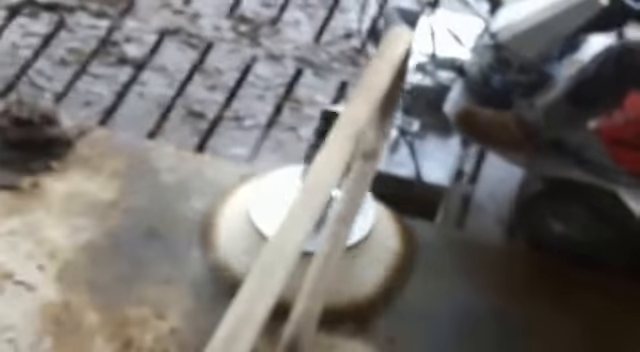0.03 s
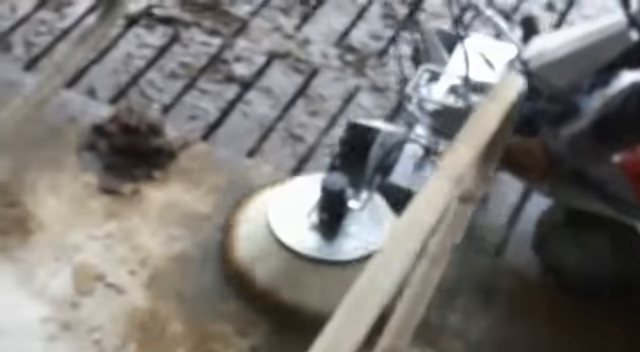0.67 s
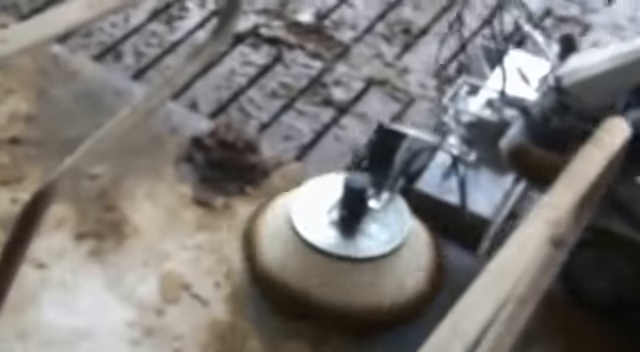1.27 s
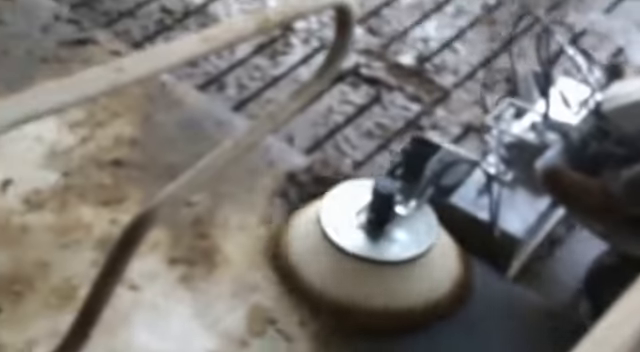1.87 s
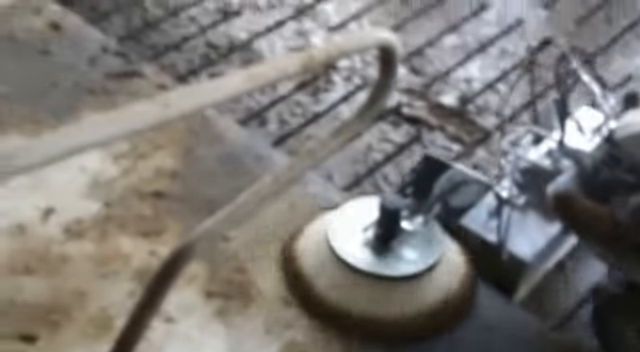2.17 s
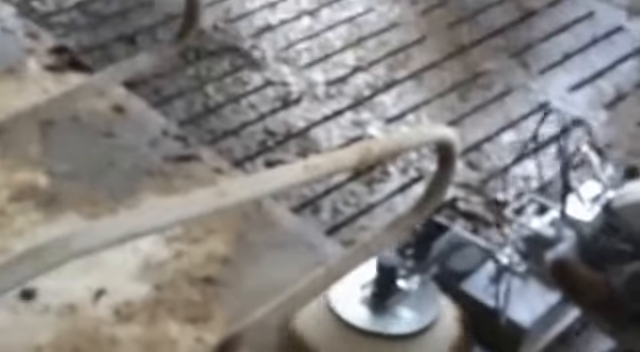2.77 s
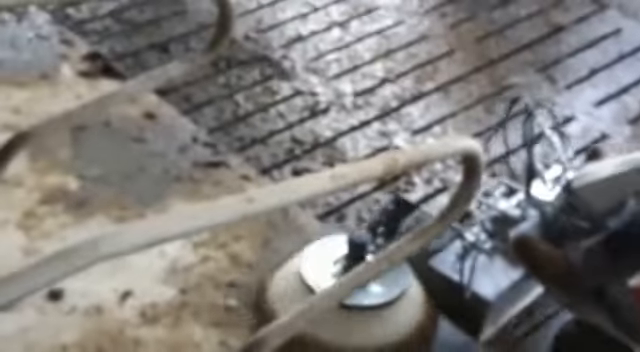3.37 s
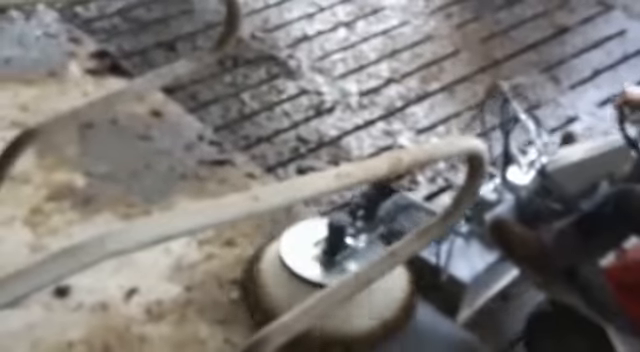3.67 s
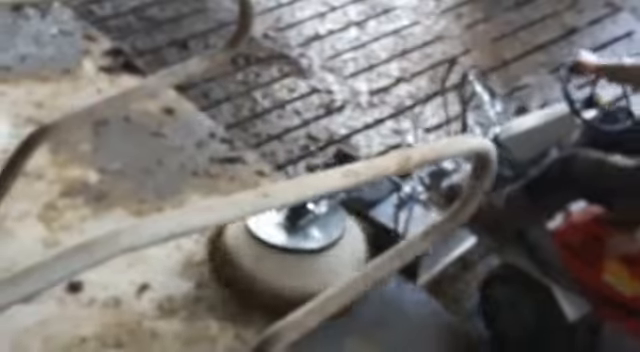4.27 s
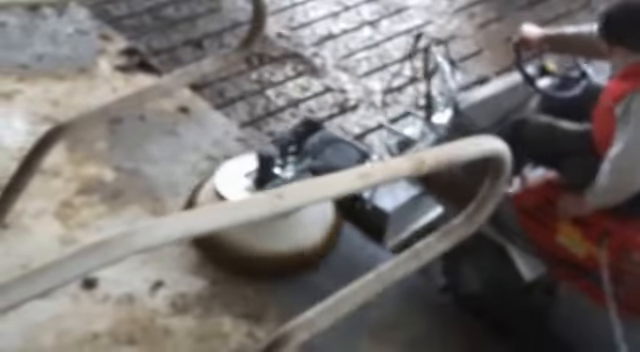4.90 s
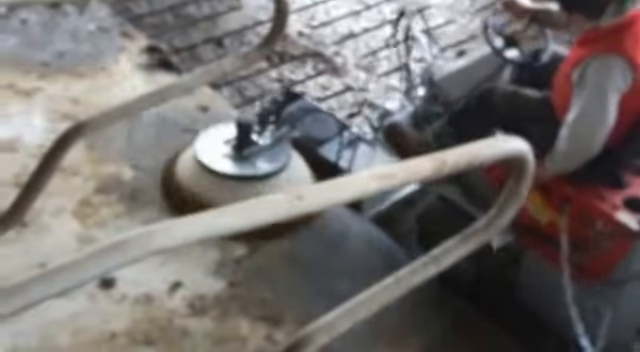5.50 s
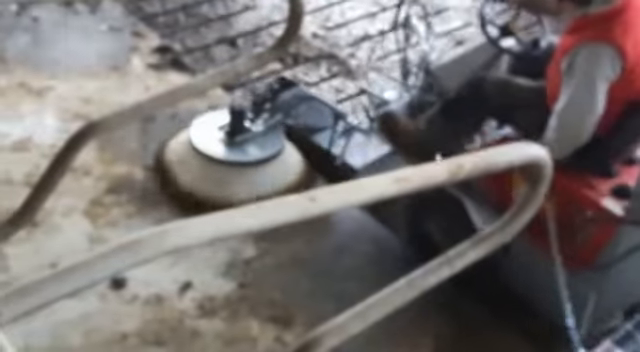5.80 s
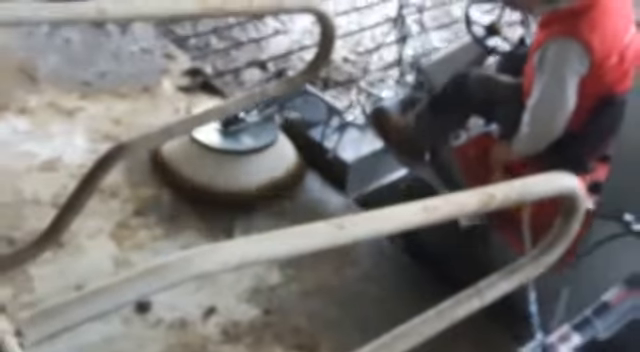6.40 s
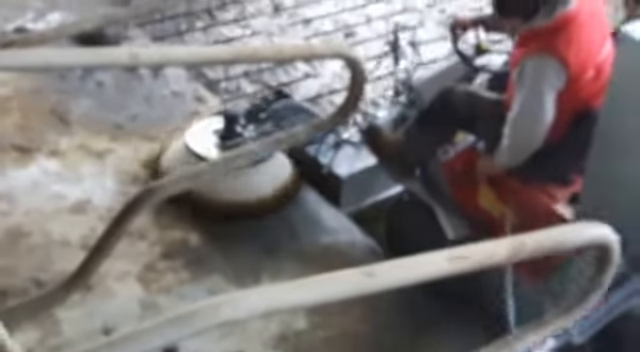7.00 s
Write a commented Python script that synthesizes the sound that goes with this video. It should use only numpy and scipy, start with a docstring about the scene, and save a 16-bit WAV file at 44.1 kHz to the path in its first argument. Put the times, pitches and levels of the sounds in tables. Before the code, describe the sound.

A small ride-on cleaning machine runs close by in a livestock shed. From the start its engine gives a loud, low, throbbing drone at nearly constant speed, with valve clatter, a shaft hum and a gear whine that swells and eases. The tone shifts slightly over the first 2.5 seconds as the machine draws alongside. Its spinning brush adds a faint, fitful rasp and a thin, very high hiss on the mats, with swishes around 0.3 seconds and between 2 and 3 seconds. At about 4.8 seconds the whole sound abruptly becomes much quieter, though the engine keeps the same speed. A small handling knock on the microphone comes at about 5.4 seconds and a sharper one at about 6.9, each a tick with a short, low ring. The soft drone and faint hiss continue to the end, just past 7 seconds.

```python
"""In a livestock shed, a ride-on cleaner creeps along the stalls. Its two-cylinder engine throbs at a
nearly steady speed while valves clatter, gears whine and a belt-driven shaft hums. The spinning brush
hisses over the mats, and the rubbing makes the brush head rasp. The whole sound suddenly gets quieter,
then two small handling knocks tick and ring in a case."""
import sys
import numpy as np
from scipy import signal
from scipy.fft import rfft, irfft, next_fast_len
from scipy.io import wavfile
from scipy.ndimage import uniform_filter1d, minimum_filter1d

SR = 44100
rng = np.random.default_rng(int(sys.argv[2]) if len(sys.argv) > 2 else 0)


def transcribe(u):
    """Save the signal u as a 16-bit wav file named by the first command-line argument.

    u: samples, shape (n,) or (channels, n), limited to [-1, 1]; the rate is SR.
    q: integer samples, one column per channel.
    """
    v = np.clip(np.atleast_2d(u).T, -1, 1)
    q = np.round(v * 32767).astype(np.int16)
    wavfile.write(sys.argv[1], SR, q)


N = 319725
T = np.arange(N) / SR
DROP_S = 4.7697  # everything gets quieter here
APPROACH_S = (0.45, 2.54)  # the machine goes from ahead of us to beside us

# Engine speed, held nearly steady by a governor; each cylinder fires once a cycle: time_s, cycle_hz
ENGINE_SPEED = [(0.0, 22.55), (1.45, 22.613), (2.03, 22.471), (2.61, 22.621), (3.48, 22.593),
                (4.93, 22.626), (7.25, 22.597)]
CYCLE_HZ = np.mean(ENGINE_SPEED, axis=0)[1]


def undb(db):
    """Turn decibels into a number to multiply by."""
    return 10 ** (np.asarray(db) / 20)


def unit(x):
    """Scale a sound to an average power of 1."""
    return x / np.sqrt(np.mean(x ** 2))


def at_drop(before, after):
    """One value until the sound drops, another from then on."""
    return np.where(T < DROP_S, before, after)


def wander(rate_hz):
    """A smooth random wobble, roughly 1 in size."""
    hold = max(int(SR / rate_hz), 1)
    steps = rng.standard_normal(8192)[np.arange(N) // hold % 8192]
    return 1.3 * uniform_filter1d(uniform_filter1d(steps, hold), hold)


def swells(rows):
    """A smooth rise and fall in decibels for each row."""
    return sum(rise_db * np.cos(np.pi * np.clip((T - peak_s) / length_s, -.5, .5)) ** 2
               for peak_s, length_s, rise_db in rows)


def colour(x, points):
    """Make each pitch louder or softer as the table says; pitches beyond its ends fall away."""
    hz, db = np.transpose(points)
    size = next_fast_len(N)
    octave, known = np.log2(np.fft.rfftfreq(size, 1 / SR) + 1), np.log2(hz)
    outside = np.abs(octave - np.clip(octave, known[0], known[-1]))
    gain = undb(np.interp(octave, known, db) - 20 * outside)
    return irfft(rfft(x, size) * gain, size)[:N]


def throb(cycle, depth, lag=.38, fade=0.28):
    """A level that jumps at both firings and dies away; lag and fade are parts of a cycle."""
    first = np.exp(-(cycle % 1) / fade)
    second = 0.23 * np.exp(-((cycle - lag) % 1) / fade)
    return unit(1 + depth * (first + second))


def silencer_ring(db):
    """The silencer rings, delaying each overtone: these phase shifts follow from the levels."""
    cepstrum = irfft(np.log(undb(np.r_[db[0], db])))
    cepstrum[len(cepstrum) // 2:] = 0  # ring only after the firing
    return 2 * rfft(cepstrum).imag[1:]


def standing_waves(travel_m_s=0.23):
    """Echoes between the stalls make loud and soft spots; some overtones swell as the machine passes."""
    # Overtones that swell: cycle_multiple, loudest_s, swing_db
    caught = [(7, 2.46, 2), (12, 5.05, 3), (16, 4.32, 2.5)]
    half_wave_m = 343 / (2 * CYCLE_HZ)
    return {round(k): db * np.cos(2 * np.pi * round(k) * travel_m_s * (T - s) / half_wave_m)
            for k, s, db in caught}


def firings(cycle, note, echo_s, echo_size, smear, second_lag=.38, second_size=0.88, waver_db=1.35):
    """Two unevenly spaced bangs a cycle, built from wavering overtones and blurred by silencer and wall."""
    multiples, levels_db = np.transpose(note)
    multiples = np.round(multiples)
    pair = 1 + second_size * np.exp(-2j * np.pi * multiples * second_lag)
    wall_echo = 1 + echo_size * np.exp(-2j * np.pi * multiples * CYCLE_HZ * echo_s)
    phases = np.angle(pair * wall_echo) + smear * silencer_ring(uniform_filter1d(levels_db, size=3))
    swing_db = standing_waves()
    sound = 0
    for k, db, phase in zip(multiples, levels_db, phases):
        gain = undb(db + swing_db.get(k, 0) + waver_db * wander(2.92))
        sound += gain * np.cos(2 * np.pi * k * cycle + phase)
    return unit(sound)


def exhaust(cycle):
    """The exhaust note changes as the machine comes by; no two firings match, and gas rumbles behind."""
    # Overtones when ahead, beside us and after the drop: cycle_multiple, level_db
    note_ahead = [(2, -29.0), (3, -19), (4, -12.5), (5, -0.5), (6, 1), (7, -5), (8, -6.5), (9, -1), (10, 2),
                  (11, -17), (12, 1), (13, 0), (14, -21), (15, -4.5), (16, -6.5), (17, -10.5), (18, -12.5),
                  (19, -39), (20, -26), (21, -16.5), (22, -39), (23, -19.5), (24, -18), (25, -13),
                  (26, -20)]
    note_beside = [(2, -30), (3, -17.5), (4, -23.5), (5, -1.2), (6, -2), (7, 0.5), (8, -2), (9, -11.5),
                   (10, -1.5), (11, -12.5), (12, -2), (13, -9.5), (14, -12.0), (15, -10), (16, -7.5),
                   (17, -12.5), (18, -14), (19, -22.5), (20, -24), (21, -14.5), (22, -23.5), (23, -25),
                   (24, -19.5), (25, -15.5), (26, -24)]
    note_quiet = [(2, -24.1), (3, -10), (4, -19.7), (5, -3), (6, 0), (7, -10), (8, -1), (9, -9), (10, 0.5),
                  (11, -14), (12, -2), (13, -13), (14, -16), (15, -3), (16, -8.5), (17, -29), (18, -32),
                  (19, -30), (20, -15.5), (21, -29), (22, -20.5), (23, -14.5), (24, -21), (25, -16.5),
                  (26, -24.6)]
    # Tone of the rushing gas: pitch_hz, level_db
    gas_tone = [(25, -23), (60, -27), (110, -13), (230, -8), (350, 0.5), (450, -9.5), (600, -18.5)]
    ahead = firings(cycle, note_ahead, echo_s=.02025, echo_size=0.79, smear=0.69, second_size=0.81)
    beside = firings(cycle, note_beside, echo_s=.023, echo_size=0.35, smear=0.32)
    quiet = firings(cycle, note_quiet, echo_s=.02475, echo_size=0.67, smear=0.5)
    blend = np.interp(T, APPROACH_S, (0, 1))
    note = at_drop((1 - blend) * ahead + blend * beside, quiet)
    note /= np.sqrt(uniform_filter1d(note ** 2, size=SR // 2))  # the tone changes, the power stays
    note *= undb(0.36 * wander(45))
    gas = unit(colour(rng.standard_normal(N), gas_tone))
    return note + undb(at_drop(-13.5, -14.3)) * gas * throb(cycle, depth=0.4)


def clatter(cycle, repeat_db=-8):
    """Valves and pistons rattle the engine: mostly fresh noise, plus a bright part that repeats."""
    # Tone of the rattle before and after the drop: pitch_hz, level_db
    loud_tone = [(380, -7), (460, -2), (560, -1.5), (720, -5), (1080, -4.5), (1300, -6), (1850, -6.5),
                 (2200, -11.5), (2500, -18.5), (3300, -19.5), (3800, -27), (4600, -32), (6200, -28.5),
                 (10500, -34)]
    quiet_tone = [(380, -3.5), (460, -5.5), (560, -6.5), (700, -6.5), (1080, -6), (1600, -8.5), (1900, -12),
                  (2200, -12.5), (2550, -20), (3350, -19.5), (3900, -28), (4700, -31), (6200, -26),
                  (10500, -30.5)]
    repeating = rng.standard_normal(2048)[(cycle % 1 * 2048).astype(int)]
    repeating = signal.sosfilt(signal.butter(6, 640, "high", fs=SR, output="sos"), repeating)
    blows = (undb(repeat_db) * repeating + rng.standard_normal(N)) * throb(cycle, depth=0.36)
    rattle = at_drop(unit(colour(blows, loud_tone)), unit(colour(blows, quiet_tone)))
    return rattle * undb(0.44 * wander(18))


def gears(cycle, slack_db=-5):
    """Gear teeth meet so fast that they whine, louder under load."""
    # The whine and its close neighbours, relative to the clatter: cycle_multiple, before_db, after_db
    tones = [(46.93, -16, -19), (48.16, -16.5, -9.5), (48, -26, -36)]
    # The gears take up load: peak_s, length_s, rise_db
    loads = [(.1, 1.3, 8), (1.8, 1.1, 9.5), (3.45, 2.6, 7), (4.45, 1.2, 5.5), (6.5, 1.2, 7.5),
             (7.25, .4, 8)]
    load_db = slack_db + swells(loads)
    whine = 0
    for k, before_db, after_db in tones:
        tone = np.sqrt(2) * np.sin(2 * np.pi * k * cycle + 0.57 * wander(12))
        whine += undb(at_drop(before_db, after_db) + load_db + 1.1 * wander(8)) * tone
    return whine


def shaft(cycle_hz, turn_hz=61.18):
    """A belt-driven shaft hums, following the engine's speed and beating against its note."""
    # Tones of the hum before and after the drop: turn_multiple, before_db, after_db
    tones = [(1, -28.5, -36), (2, -35.5, -55), (3, -31, -46), (4, -29, -49)]
    turns = np.cumsum(turn_hz * cycle_hz / cycle_hz.mean()) / SR
    hum = 0
    for k, before_db, after_db in tones:
        tone = np.sqrt(2) * np.sin(2 * np.pi * (k * turns + rng.random()))
        hum += undb(at_drop(before_db, after_db)) * tone
    return hum


def rasp(lean_s=(1.95, 2.3), upright_hz=1902, leaning_hz=1777, quiet_hz=1903, width_hz=190):
    """Rubbing makes the brush head ring in fits; the pitch sinks when the head leans over."""
    # The head catches and sings out: peak_s, length_s, rise_db
    catches = [(.6, .9, 4), (1.35, 0.52, 3.8), (1.95, 0.44, 5), (2.5, 0.76, 3)]
    pitch_hz = at_drop(np.interp(T, lean_s, (upright_hz, leaning_hz)), quiet_hz)
    fade_db = 5 * np.maximum(T - 2.7, 0)  # the machine moves on
    level_db = at_drop(-34 - fade_db, -53) + swells(catches)
    phase = 2 * np.pi * np.cumsum(pitch_hz + 15 * wander(25)) / SR
    rough_tone = wander(width_hz) * np.cos(phase) + wander(width_hz) * np.sin(phase)
    return undb(level_db) * unit(rough_tone * undb(1.4 * wander(40)))


def brush(cycle, grain_db=1.0, flutter_db=0.8):
    """Countless bristle tips, shaken by the engine, flick over the gritty mat and hiss."""
    # Tone of the hiss: pitch_hz, level_db
    hiss_tone = [(9500, -20), (11000, -18), (11900, -5), (12400, -7.5), (13500, -0.5), (14400, 1),
                 (15700, 0.5)]
    # The brush presses harder on the mat: peak_s, length_s, rise_db
    swishes = [(.32, .7, 4), (1.78, .25, 3), (2.08, 0.33, 4.5), (2.19, .1, 7), (2.41, .14, 4.5),
               (2.76, .35, 2.7), (3.04, .2, 7.3), (3.4, .5, 1.8), (6.78, .45, 4), (7.2, 0.31, 3)]
    flicks = rng.standard_normal(N) * undb(grain_db * wander(900)) * throb(cycle, depth=0.71)
    level_db = at_drop(-34, -50) + swells(swishes) + flutter_db * wander(30)
    return unit(colour(flicks, hiss_tone)) * undb(level_db)


def knocks(rise_s=0.0045):
    """Each handling knock is a sharp tick, then the short low ring of the case."""
    # The knocks: start_s, thump_db, tick_db
    hits = [(5.3531, -15, -22), (6.867, -13.5, -3)]
    # Notes of the case: pitch_hz, level_db, ring_s (time to fade by 60 dB)
    case_notes = [(223.5, -1.5, 0.13), (350, 0, .035), (750, 6, .008)]
    # Tone of the tick: pitch_hz, level_db
    tick_tone = [(300, 1), (1200, 8), (2500, 1), (3500, -14), (4400, -6), (5200, 5.5), (6000, -8),
                 (7500, -3), (11000, -20), (15000, -14)]
    thumps, ticks = np.zeros(N), np.zeros(N)
    for start_s, thump_db, tick_db in hits:
        age = np.maximum(T - start_s, 0)
        ring = sum(undb(thump_db + db - 60 * age / ring_s) * np.sin(2 * np.pi * hz * age)
                   for hz, db, ring_s in case_notes)
        thumps += ring * (1 - np.exp(-age / rise_s))
        ticks[int(start_s * SR)] = undb(tick_db)
    return thumps + colour(ticks, tick_tone)


def scene():
    """Engine, shaft, brush and knocks, all heard from one spot."""
    cycle_hz = np.interp(T, *np.transpose(ENGINE_SPEED))
    cycle = np.cumsum(cycle_hz) / SR - .749 + .001 * wander(40)  # counts engine cycles, a bit unevenly
    ahead = np.interp(T, APPROACH_S, (1, 0))  # the engine is a little louder while still ahead
    exhaust_db = at_drop(-13.5, -33.5) + 1.7 * ahead
    clatter_db = at_drop(-22, -41) + 0.6 * ahead
    engine = undb(exhaust_db) * exhaust(cycle) + undb(clatter_db) * (clatter(cycle) + gears(cycle))
    return (engine + shaft(cycle_hz) + rasp() + brush(cycle) + knocks())[None]


def record(dry, ceiling=0.84, top_hz=15750):
    """Briefly turn down the loudest peaks, then cut the highest treble."""
    needed = np.minimum(1, ceiling / (np.abs(dry[0]) + 1e-9))
    gain = uniform_filter1d(minimum_filter1d(needed, size=300), size=300)
    return signal.sosfilt(signal.ellip(12, .1, 90, top_hz, fs=SR, output="sos"), dry * gain)


dry = scene()
out = record(dry)
transcribe(out)
```